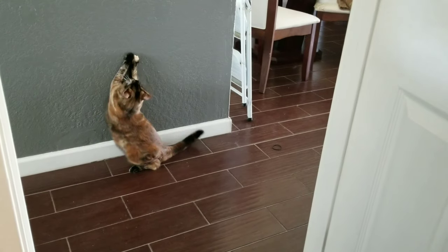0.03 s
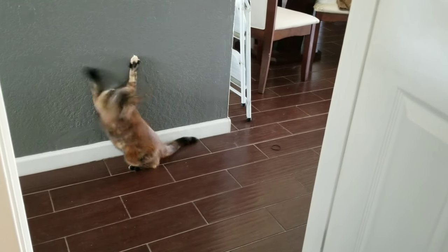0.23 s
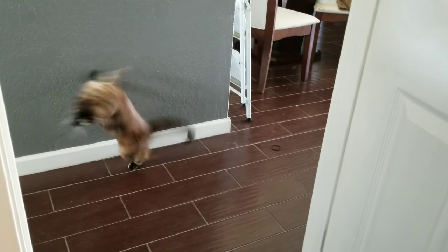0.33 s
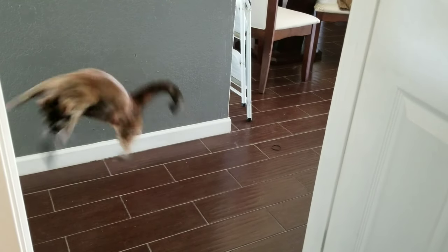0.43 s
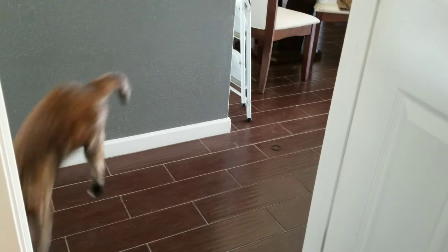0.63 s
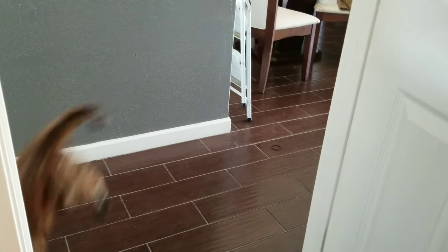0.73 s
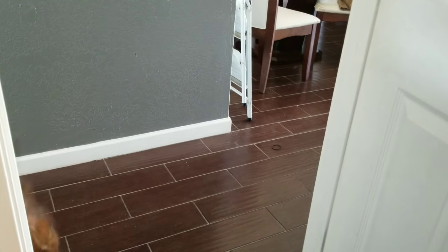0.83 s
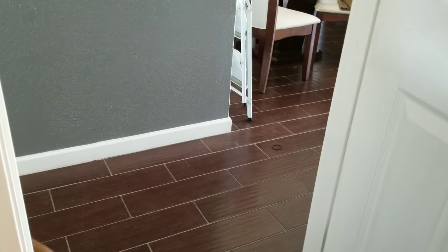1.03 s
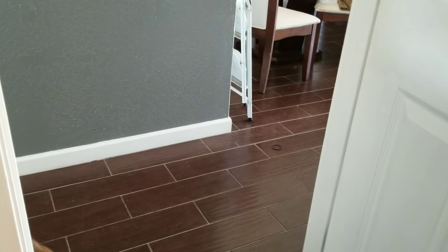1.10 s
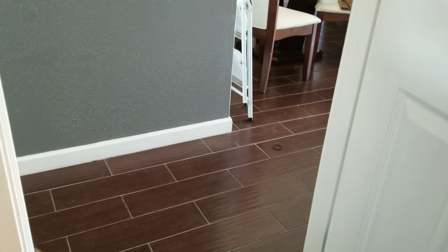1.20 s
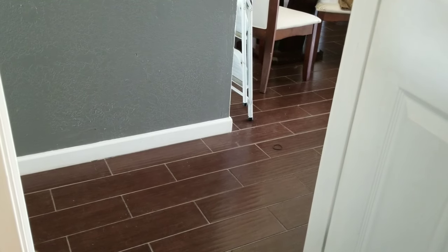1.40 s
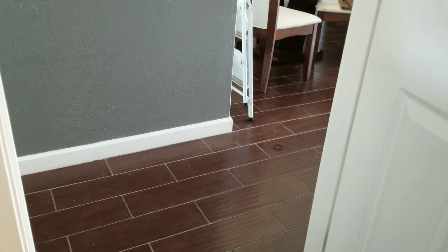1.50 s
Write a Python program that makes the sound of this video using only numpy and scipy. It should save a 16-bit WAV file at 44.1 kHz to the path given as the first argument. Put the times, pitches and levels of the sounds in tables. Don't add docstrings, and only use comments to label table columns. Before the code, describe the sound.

Cat scrabbles and kicks off a plaster wall with a short trill, then thumps down and trots away

```python
import sys
import numpy as np
from scipy import signal
from scipy.fft import rfft, irfft, next_fast_len
from scipy.io import wavfile
from scipy.ndimage import map_coordinates

SR = 44100
rng = np.random.default_rng(int(sys.argv[2]) if len(sys.argv) > 2 else 0)


def inscribe(sig):
    pcm = np.round(np.clip(np.atleast_2d(sig).T, -1, 1) * 32767)
    wavfile.write(sys.argv[1], SR, pcm.astype(np.int16))


def invert_db(x):
    u = np.asarray(x, float) / 20
    return 10 ** u


N = 68355


def unit(x):
    return x / np.sqrt(np.mean(x ** 2) + 1e-20)


def along(points, hz):
    f, value = np.transpose(points)
    return np.interp(np.log(hz + 1), np.log(f + 1), value)


def wobble(rate):
    knots = rng.standard_normal(int(N * rate / SR) + 4)
    return map_coordinates(knots, [np.arange(N) * rate / SR])


def filtered(x, response):
    m = next_fast_len(N + SR // 2)
    return irfft(rfft(x, m) * response(np.fft.rfftfreq(m, 1 / SR)), m)[..., :N]


def body(peaks):
    def response(f):
        return sum((-1) ** k * invert_db(db) * 1j * f * width / (centre * centre - f * f + 1j * f * width)
                   for k, (centre, width, db) in enumerate(peaks))
    return response


# f/Hz, correlation
COHERENCE = [(60, 1), (200, 0.86), (400, 0.44), (900, 0.078), (2000, 0)]


def spread(pair):
    def mid_side(hz):
        turn = np.arccos(np.clip(along(COHERENCE, hz), -1, 1)) / 2
        return np.array([np.cos(turn), np.sin(turn)])
    mid, side = filtered(pair, mid_side)
    return np.array([mid + side, mid - side])


# f/Hz, t60/s
ROOM_T60 = [(60, 0.52), (250, 0.37), (500, 0.72), (1000, 0.4), (2500, 0.38), (5000, 0.37), (10000, 0.28)]


def room(x, wet_db):
    hz, t, noise = signal.stft(rng.standard_normal((2, N)), SR, nperseg=256)
    decaying = noise * invert_db(-60 * t / along(ROOM_T60, hz)[:, None])
    tail = spread(signal.istft(decaying, SR, nperseg=256)[1][:, :N])
    tail = tail / np.linalg.norm(tail[0])
    delayed = np.pad(x, (250, 0))
    return x + invert_db(wet_db) * signal.fftconvolve(delayed[None], tail, axes=1)[:, :N]


# f/Hz, level/dB per Hz
HUM_SPECTRUM = [(20, -47), (40, -6), (58, 1), (130, -4), (210, -14), (330, -14.5), (900, -23),
                (1500, -37.5)]
# f/Hz, level/dB per Hz
HISS_SPECTRUM = [(590, -32), (1000, -14), (1970, -8), (2500, -10.5), (6110, -15.5), (8800, -16.5),
                 (12700, -5.5), (13600, -11.5), (14500, -12)]
# f/Hz, width/Hz, level/dB
WHINE_LINES = [(10540, 12, 7.5), (13100, 13, -7), (12890, 25, -2), (15200, 40, 3)]


def house():
    hum = filtered(rng.standard_normal((2, N)),
                   lambda hz: invert_db(along(HUM_SPECTRUM, hz)) * (hz > 25) * (hz < 1500))
    hum = unit(spread(hum))
    hiss = unit(filtered(
        rng.standard_normal((2, N)),
        lambda hz: invert_db(along(HISS_SPECTRUM, hz)) * (hz > 1200) * (1 + abs(body(WHINE_LINES)(hz)))))
    hum_level = invert_db(-60.15 + 0.8 * wobble(5.44))
    return hum_level * hum + invert_db(-71) * hiss * invert_db([[1], [-1]])


# middle t/s, half length/s, level/dB
BODY_SHIFTS = [
    (0.001, 0.054, -62),
    (0.235, 0.063, -61),
    (0.571, 0.064, -58.5),
    (1.014, 0.063, -60.5),
    (1.183, 0.07, -65.5),
    (1.48, 0.032, -67.5),
]
# f/Hz, level/dB per Hz
BRUSH_SPECTRUM = [(80, -12.5), (150, -3.5), (300, -9), (520, -13.5), (900, -15), (1200, -26), (2500, -47)]


def shuffle():
    t = np.arange(N) / SR
    swell = sum(invert_db(db) * np.exp(-((t - s) / half) ** 2) for s, half, db in BODY_SHIFTS)
    brush = filtered(rng.standard_normal((2, N)), lambda hz: invert_db(along(BRUSH_SPECTRUM, hz)))
    return swell * invert_db(1.06 * wobble(40.3)) * unit(spread(brush))


# t/s, f/Hz, sag/Hz per s, level/dB, t60/s
TILE_RINGS = [(.273, 203.7, 1606, -30.5, 0.16), (.335, 88.5, 297, -38.5, 0.37), (.744, 384, 6, -39.5, .12),
              (.778, 501.6, 691, -45.5, 0.35), (.874, 410, -7, -50, 0.14), (.878, 227.6, 2, -44.5, 0.31),
              (.888, 720, 0, -46.5, 0.056), (0.995, 330.4, 0, -51.5, 0.21), (1.046, 212, 0, -50, 0.12),
              (1.425, 148.5, -3, -50, 0.34), (1.44, 702, 0, -61, 0.082)]


def tiles():
    out = np.zeros(N)
    for s, hz, sag, db, t60 in TILE_RINGS:
        t = np.clip(np.arange(N) / SR - s, 0, None)
        rise = 1 - np.exp(-t / 0.0044)
        pitch = hz - sag * np.minimum(t, 0.2) / 2
        out += invert_db(db - 60 * t / t60) * rise * np.sin(2 * np.pi * pitch * t)
    return out


# f/Hz, level/dB per Hz
PUFF_SPECTRUM = [(100, -17.5), (250, 5.5), (400, 2.5), (520, -4.5), (950, -11.5), (1450, -13.5),
                 (2300, -35.5), (5000, -43)]


def paws(contacts, peaks, boom, gain_db, puff_db, puff_s, wet_db):
    t = np.arange(N) / SR
    knock, weight, puff = np.zeros((3, N))
    for s, knock_db, weight_db, contact in contacts:
        u = np.clip(t - s, 0, 1) / contact
        knock += invert_db(knock_db) * u * np.exp(1 - u)
        weight += invert_db(weight_db) * u / 4 * np.exp(1 - u / 4)
        puff += invert_db(knock_db + puff_db) * np.clip(u / 3, 0, 1) * np.exp(-u * contact / puff_s)
    fur = puff * unit(filtered(rng.standard_normal(N), lambda hz: invert_db(along(PUFF_SPECTRUM, hz))))
    soft = filtered(knock, lambda hz: body(peaks)(hz) / (1 + 1j * hz / 1200) ** 2)
    thud = invert_db(-0.5) * filtered(weight, body(boom))
    return invert_db(gain_db) * (room(soft + fur, wet_db) + thud)


# t/s, knock level/dB, weight level/dB, contact/s
FLOOR_CONTACTS = [(.735, -43, -59, 0.00017), (.741, -36.5, -38, 0.00025), (.747, -45, -54, 0.0017),
                  (.753, -41, -35, 0.00041), (.776, -40, -40, 0.0006), (.787, -46.5, -68, 0.00068),
                  (.808, -44.5, -79, 0.0015), (.833, -49.5, -58, 0.00046), (.871, -42, -70, 0.00026),
                  (.882, -51, -67, 0.00084), (.903, -48, -46.5, 0.0011), (.992, -50, -56, 0.0007),
                  (1.008, -64, -51, 0.00061), (1.034, -58, -74, 0.0017), (1.052, -52, -64, 0.001),
                  (1.095, -59, -54, 0.00051), (1.12, -52.5, -60, 0.0023), (1.421, -55, -65, 0.00059),
                  (1.445, -56, -63, 0.00079), (1.47, -63, -61, 0.0035)]
# f/Hz, width/Hz, level/dB
FLOOR_MODES = [(134, 35, -2), (213, 62, 1), (258, 34, -1), (383, 64, 0), (497, 76, -6), (780, 130, -9),
               (982, 60, -3), (1346, 77, -7)]
# f/Hz, width/Hz, level/dB
FLOOR_BOOM_MODES = [(53.2, 8.5, 1), (86.4, 11, -5.5)]


def floor_steps():
    return paws(FLOOR_CONTACTS, FLOOR_MODES, FLOOR_BOOM_MODES,
                gain_db=13.5, puff_db=-25.0, puff_s=0.019, wet_db=-8)


# t/s, f/Hz, level/dB, mouth opening/dB
TRILL_COURSE = [
    (.345, 505, -70, -15),
    (.36, 502, -51, -14),
    (.387, 490, -56, -12),
    (.394, 476, -48, -9),
    (.435, 497, -48, 0),
    (.47, 472, -48, -3),
    (.484, 425, -58, -8),
    (.545, 402, -53, -14),
    (.56, 395, -80, -16),
]
# f/Hz, width/Hz, level/dB
THROAT_FORMANTS = [(423, 610, -1.5), (936, 350, 2), (1530, 500, -0.5)]


def trill():
    s, hz, db, mouth_db = np.transpose(TRILL_COURSE)
    t = np.arange(N) / SR
    pitch = np.interp(t, s, hz) * (1 + 0.013 * wobble(149.5))
    phase = 2 * np.pi * np.cumsum(pitch) / SR
    mouth = invert_db(np.interp(t, s, mouth_db))
    pulses = 0.93 * np.cos(phase) + mouth ** 0.21 * np.cos(2 * phase)
    pulses += mouth * (np.cos(3 * phase) + 0.084 * np.cos(4 * phase))
    breath = invert_db(-12.5) * 4 * (1 + np.cos(phase)) * rng.standard_normal(N)
    voice = filtered(pulses + breath, lambda f: body(THROAT_FORMANTS)(f) / (1 + (f / 1900) ** 6))
    flutter_db = 2 * np.sin(2 * np.pi * 45 * t)
    shimmer_db = 2 * wobble(87.35)
    level_db = np.interp(t, s, db, left=-140, right=-140) + 0.26 + flutter_db + shimmer_db
    squeak = invert_db(-56) * np.exp(-((t - 0.544) / 0.018) ** 2) * np.sin(2 * np.pi * 1058 * t)
    return room(voice * invert_db(level_db) + squeak, wet_db=-4)


# t/s, knock level/dB, weight level/dB, contact/s
WALL_CONTACTS = [(.001, -48, -60.5, 0.0011), (.024, -61, -60, 0.00093), (.04, -46, -64, 0.00013),
                 (.09, -48.5, -72, 0.0011), (.16, -48.5, -67, 0.00053), (.176, -69, -74, 0.00016),
                 (.2465, -28.5, -36.5, 0.00066), (.253, -33.5, -36, 0.0016), (.266, -31.5, -50, 0.00099),
                 (.276, -38, -36.5, 0.00051), (.282, -40.5, -35.5, 0.0019), (.287, -63, -49, 0.003),
                 (.315, -37, -48, 0.0016), (.337, -45, -75, 0.00081), (.355, -47, -54, 0.00088),
                 (.37, -44, -47, 0.00024)]
# f/Hz, width/Hz, level/dB
WALL_MODES = [(143, 80, -3), (194.7, 49, 1), (297, 59, -17), (396, 40, -7.5), (666, 160, -32),
              (960, 280, -9), (1480, 280, -3)]
# f/Hz, width/Hz, level/dB
WALL_BOOM_MODES = [(49, 15.4, 10.5), (68.2, 6.7, 9.5)]


def wall_kicks():
    return paws(WALL_CONTACTS, WALL_MODES, WALL_BOOM_MODES,
                gain_db=9.5, puff_db=-22, puff_s=0.011, wet_db=-5.0)


STROKE_TIMES = [-.04, .165, .2405, .2475, .261, .2745, .283, .303, .331, .74, .795]
# length/s, level/dB, top octave level/dB
CLAW_STROKES = [(0.053, -58, -29), (0.32, -71.5, 2.5), (0.0071, -54.5, 5), (0.026, -50, 5.5),
                (0.0077, -48.5, 1), (0.018, -38, 5), (0.027, -43.5, -2), (0.024, -46.5, 4),
                (0.021, -49.5, 3), (0.047, -74.5, -3), (0.057, -68.5, 9)]
# f/Hz, level/dB per Hz
CLAW_SPECTRUM = [(410, 2), (700, -13.5), (1430, -5.5), (1810, -7.5), (2220, -1), (2390, -4), (7010, -15.5),
                 (12200, -15), (14900, -19)]
# f/Hz, width/Hz, level/dB
CLAW_TIP_MODES = [(2693, 87, -2), (4850, 150, -3)]
# t/s, length/s, level/dB
CLAW_SNAG = (.3215, .005, -38)


def claws():
    t, out = np.arange(N) / SR, np.zeros((2, N))
    slips = (rng.random((2, N)) < 3500 / SR) * rng.standard_normal((2, N))
    slips = slips * invert_db(2.5 * rng.standard_normal((2, N)))
    fur = invert_db(2) * rng.standard_normal((2, N))
    grain = (unit(slips) + fur) * invert_db(1.9 * wobble(181.1))
    raw = unit(filtered(
        grain, lambda hz: invert_db(along(CLAW_SPECTRUM, hz)) * (hz > 500) * (1 + body(CLAW_TIP_MODES)(hz))))
    top = filtered(raw, lambda hz: 1 / (1 + (7500 / (hz + 1)) ** 8))
    for s, (length, db, bright_db) in zip(STROKE_TIMES, CLAW_STROKES):
        bite = np.clip((t - s) / 0.0006, 0, 1)
        fade = np.clip((s + 1.65 * length - t) / length, 0, 1)
        out += invert_db(db) * bite * fade * (raw + (invert_db(bright_db) - 1) * top)
    s, length, db = CLAW_SNAG
    bite = np.clip((t - s) / 0.00044, 0, 1)
    fade = np.clip((s + 1.54 * length - t) / length, 0, 1)
    out += invert_db(db) * bite * fade * unit(top)
    tail = room(out[0], wet_db=-4.5) - out[0]
    return out + tail


# f/Hz, level/dB
WALL_LEAN = [(60, 0.5), (300, 2.5), (1200, -1.5), (2300, 0), (4300, 6.5), (8000, 5.5), (12500, 5.5)]


def scene():
    def wall_path(hz):
        lean = invert_db(np.array([[0.5], [-0.5]]) * along(WALL_LEAN, hz))
        return lean * (1 - 0.51 * np.exp(-((hz - 7120) / 930) ** 2))
    wall = filtered(claws() + wall_kicks(), wall_path)
    steps = floor_steps() + tiles()
    left = invert_db([[0.8], [-0.8]])
    return wall + trill() * invert_db([[-0.7], [0.7]]) + steps * left + (house() + shuffle()) * left


def low_pass(x):
    return signal.sosfilt(signal.butter(12, 15070, fs=SR, output="sos"), x)


def record(dry):
    def band_limits(hz):
        treble = np.where(hz < 14560, 1, invert_db(-27) * (hz < 15000))
        return treble / np.sqrt(1 + (41 / (hz + 1)) ** 8)
    mix = filtered(dry, band_limits)
    return low_pass(mix)


dry = scene()
out = record(dry)
inscribe(out)
```